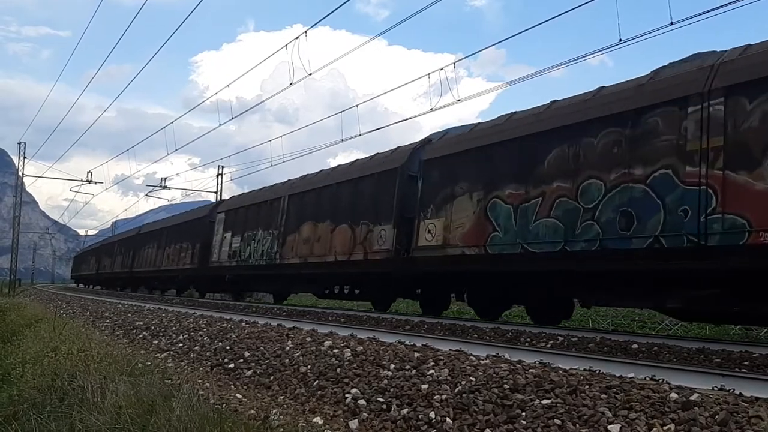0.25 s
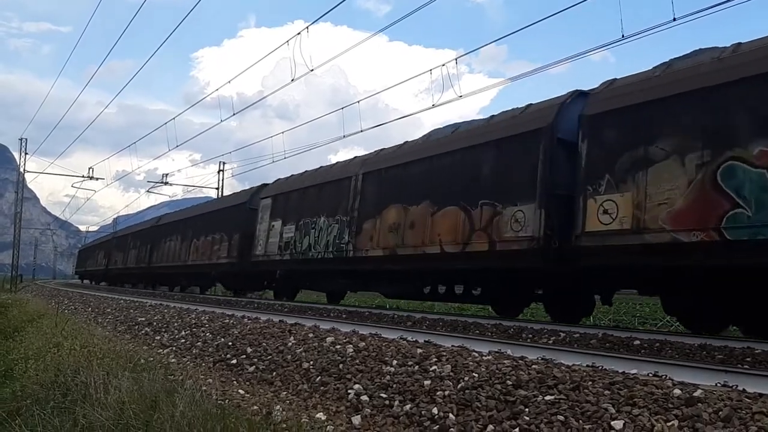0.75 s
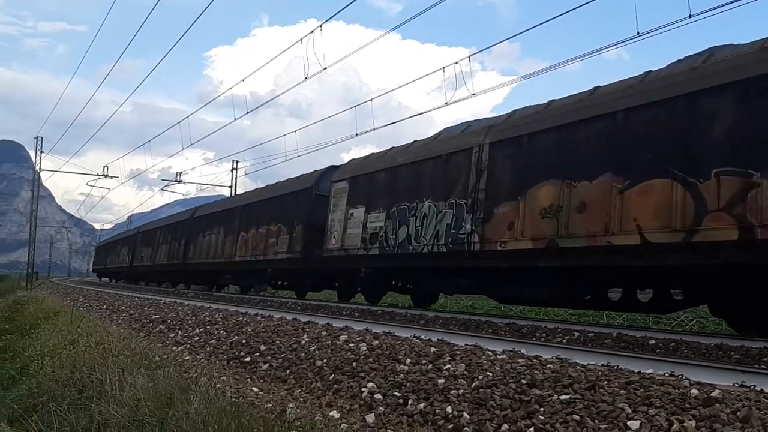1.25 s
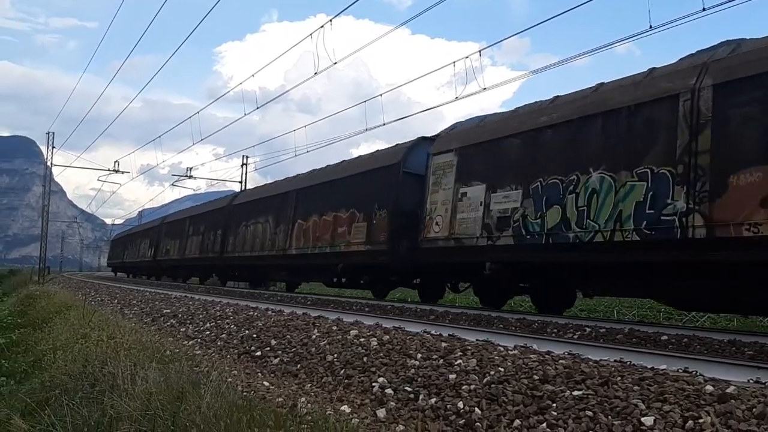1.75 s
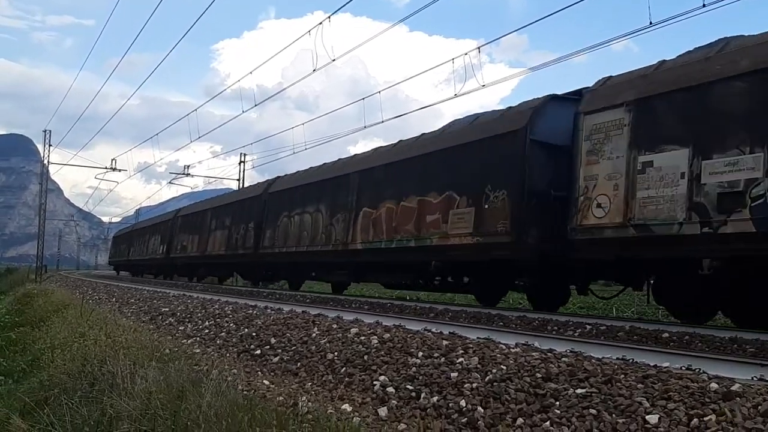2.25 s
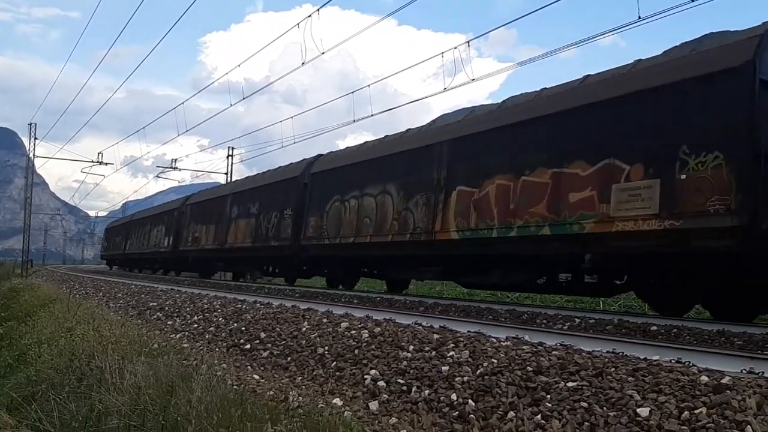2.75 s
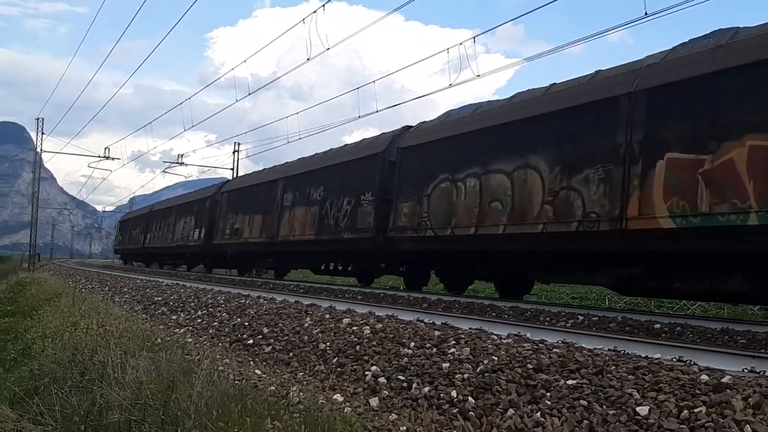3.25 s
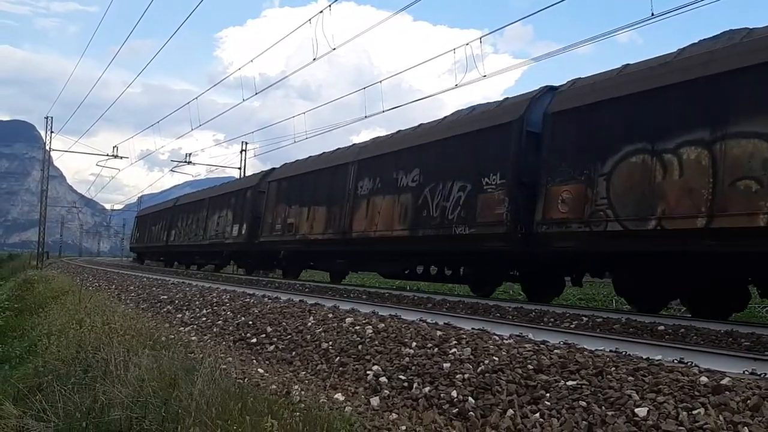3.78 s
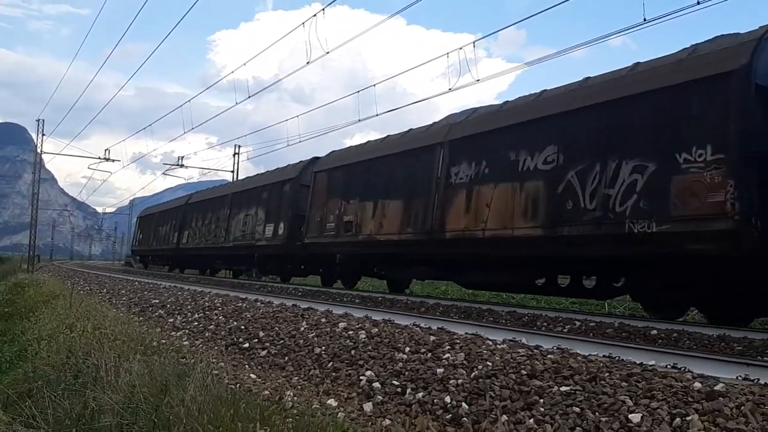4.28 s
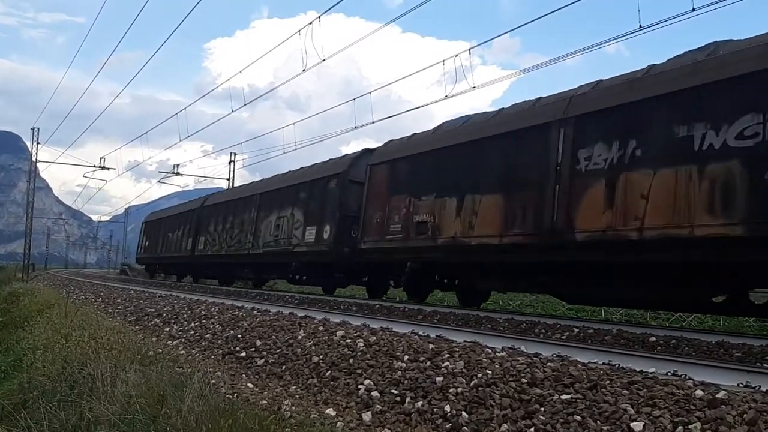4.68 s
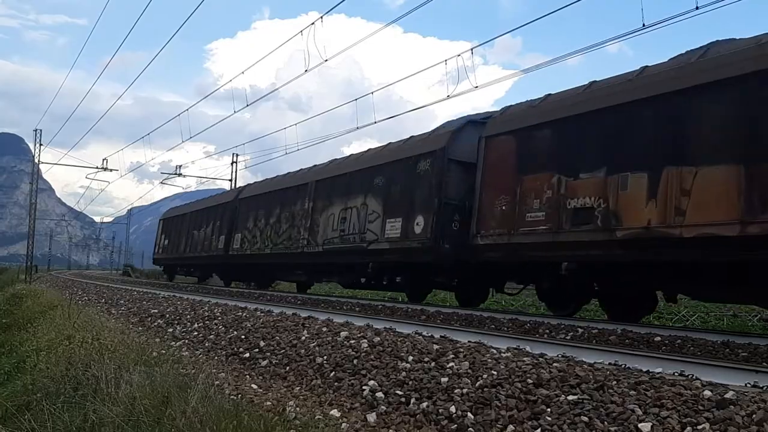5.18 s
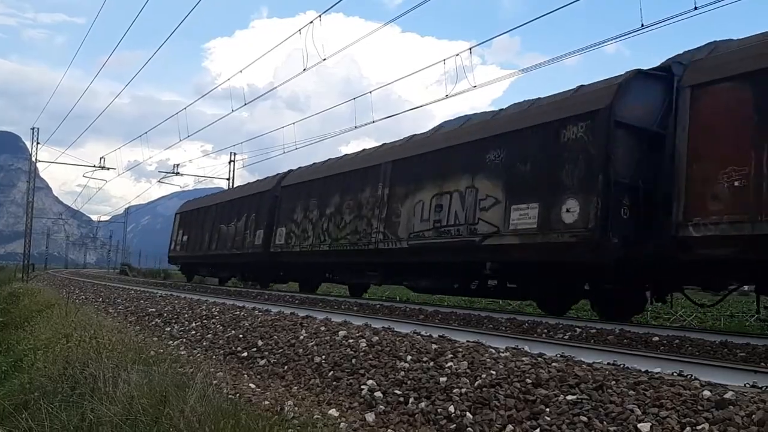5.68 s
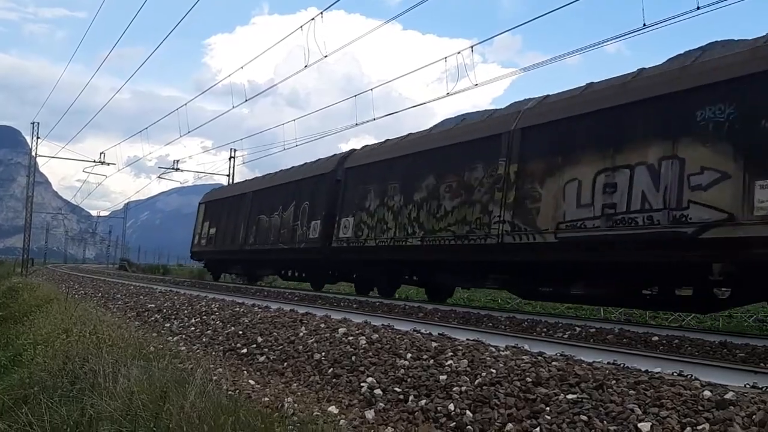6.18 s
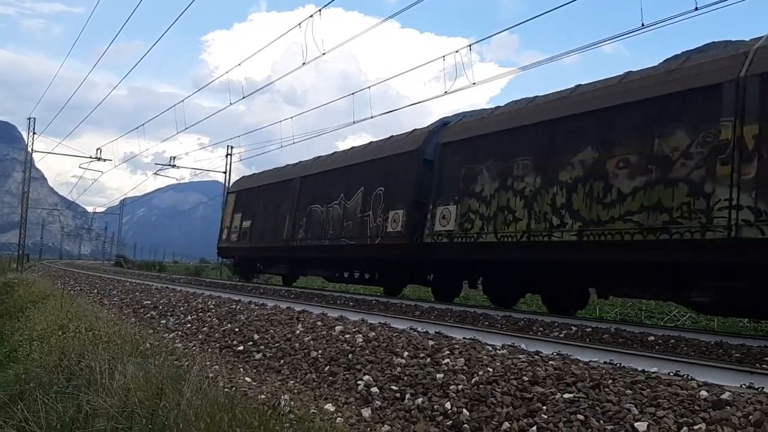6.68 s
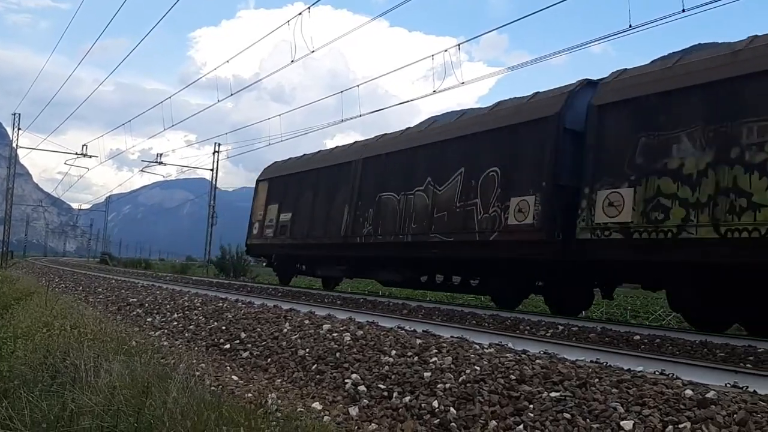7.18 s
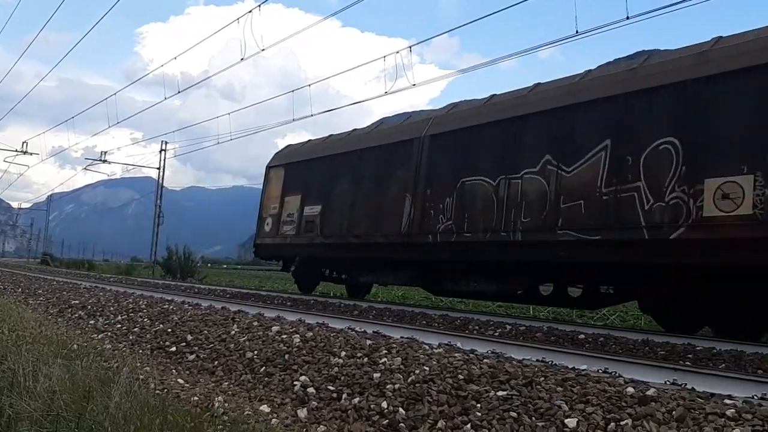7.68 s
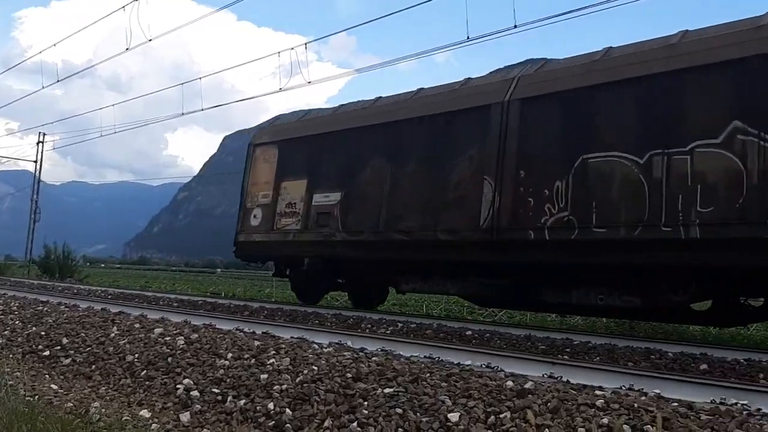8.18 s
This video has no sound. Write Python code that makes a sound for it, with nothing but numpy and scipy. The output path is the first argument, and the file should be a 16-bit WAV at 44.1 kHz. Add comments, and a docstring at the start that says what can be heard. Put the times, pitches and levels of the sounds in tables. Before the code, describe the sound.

Freight wagons rumble past on rails while a loud, high brake squeal sets in and then fades down the line.

```python
"""Beside a ballasted track, freight wagons roll past, their bodies booming and their wheels roaring.
Rough patches on the treads scuff and chirp, and steel hisses on steel. One braked bogie grinds
by stick-slip friction, which drives its wheel modes into a squeal; the tones sink in pitch by the
Doppler effect and fade down the line. Later brakes rub more lightly.
The right microphone faces away from the wheels, so the treble reaches mainly the left."""
import sys
import numpy as np
from scipy import signal
from scipy.fft import rfft, irfft, next_fast_len
from scipy.io import wavfile
from scipy.ndimage import uniform_filter1d

SR = 44100
rng = np.random.default_rng(int(sys.argv[2]) if len(sys.argv) > 2 else 0)


def dump_mix(stems):
    """Bounce the given channels to the path in sys.argv[1] as a 16-bit WAV at rate SR."""
    frames = np.atleast_2d(stems).T  # one column per channel
    limited = np.clip(frames, -1, 1)  # hard clip at full scale
    pcm = np.round(limited * 32767).astype(np.int16)
    wavfile.write(sys.argv[1], SR, pcm)


N = 371763
TIME = np.arange(N) / SR
TICKS = np.linspace(0, TIME[-1], 8192)   # coarse time grid for modulation
BITE_S, LET_GO_S = 2.117, 6.0   # the squealing bogie's brake blocks close and open


def from_db(db):
    """Amplitude grows tenfold for every 20 dB."""
    return np.exp(np.log(10) / 20 * np.asarray(db))


def unit_power(x):
    """Division by the root mean square gives unit power."""
    return x / np.sqrt(np.mean(np.abs(x) ** 2) + 1e-20)


def in_time(rows):
    """Linear interpolation gives a curve's value at every sample."""
    return np.interp(TIME, *np.transpose(rows))


def at_hz(points, hz):
    """Interpolation on a logarithmic frequency axis gives a spectrum's value."""
    point_hz, value = np.transpose(points)
    return np.interp(np.log(np.maximum(hz, 1)), np.log(point_hz), value)


def held(start_s, end_s, attack_s, release_s):
    """A trapezoidal envelope: attack, hold and release."""
    return np.clip(np.minimum((TIME - start_s) / attack_s, (end_s - TIME) / release_s), 0, 1)


def delayed(x, lag_s):
    """Propagation delays a sound by its travel time."""
    return np.pad(x, (round(lag_s * SR), 0))[:N]


def pan(left_over_right_db):
    """A level difference sets direction: left and right gains whose mean is one."""
    ratio = from_db(left_over_right_db)
    return np.array([2 * ratio, np.full_like(ratio, 2)]) / (1 + ratio)


def shelf(x, edge_hz, db):
    """A shelving filter raises or lowers everything below an edge."""
    low = signal.sosfiltfilt(signal.butter(2, edge_hz, fs=SR, output="sos"), x)
    return x + (from_db(db) - 1) * low


def wander(width_hz):
    """Low-pass complex noise of unit power gives random modulation, one value a tick."""
    hz = np.fft.fftfreq(len(TICKS), TICKS[1])
    white = rng.standard_normal(len(hz)) + 1j * rng.standard_normal(len(hz))
    return unit_power(np.fft.ifft(white / (1 + (hz / width_hz) ** 2)))


def noise(colour, coherence, flutter_db, flutter_hz):
    """Partially coherent stereo noise of unit power, with a shaped spectrum and a fluttering level."""
    size = next_fast_len(N, real=True)
    shape = from_db(at_hz(colour, np.fft.rfftfreq(size, 1 / SR))).astype(np.float32)
    white = rng.standard_normal((2, size), dtype=np.float32)
    mid, side = irfft(rfft(white) * shape, size)[:, :N]
    mid, side = np.sqrt(1 + coherence) * mid, np.sqrt(1 - coherence) * side
    flutter = np.interp(TIME, TICKS, from_db(flutter_db * wander(flutter_hz).real))
    return unit_power(np.array([mid + side, mid - side]) * flutter)


def bursts(rows, rough, width_hz, settle_s):
    """Random modulation broadens short swelling tones; the longer ones are purer."""
    out, unrest = np.zeros(N), wander(width_hz)
    for centre_s, half_s, hz, db in rows:
        modulation = unit_power(1 + rough * min(1, settle_s / half_s) * unrest)
        on = slice(*np.searchsorted(TIME, [centre_s - half_s, centre_s + half_s]))
        swell = np.cos(np.pi / 2 * (TIME[on] - centre_s) / half_s) ** 2
        tone = np.interp(TIME[on], TICKS, modulation) * np.exp(2j * np.pi * hz * TIME[on])
        out[on] += from_db(db) * swell * tone.real
    return out


# Boom of the wagons. Each row: time in seconds, level in dB before the bass shelf.
BOOM_LEVEL = [(0.1, -32), (0.99, -31), (1.11, -39), (1.32, -29), (1.38, -35.5), (1.85, -32), (3.29, -43),
              (4.14, -39.5), (4.49, -44.5), (4.54, -36.5), (5.64, -33.5), (5.66, -41), (5.91, -45.5),
              (7.5, -36), (7.64, -43), (7.73, -34.5), (7.82, -42.5), (8.35, -39)]
# Its spectrum. Each row: frequency in Hz, relative density in dB.
BOOM_SPECTRUM = [(20, -45), (32, -37), (50, -21), (64, -11), (80, -4), (102, 2.5), (130, 0), (190, -3.5),
                 (250, -21.5), (400, -26.5), (900, -73.5)]
# Its deep bass. Each row: time in seconds, shelf gain in dB.
BOOM_BASS = [(0, -6), (1.3, 11), (3.6, 8), (5.8, -2), (6.6, -5), (8.43, -11)]
# Its direction. Each row: time in seconds, left over right in dB before a small rightward shift.
BOOM_SIDE = [(0.1, -8.5), (3.27, -10), (3.38, -7), (3.82, 6.5), (6.17, 1.5), (8.35, 3.5)]


def rumble(bass_edge_hz=70, rightward_db=.7):
    """Structure-borne vibration radiates from wagon bodies and track bed as a boom, with a few knocks."""
    boom = noise(BOOM_SPECTRUM, coherence=0.93, flutter_db=1.5, flutter_hz=9.7)
    boom = shelf(from_db(in_time(BOOM_LEVEL)) * boom, bass_edge_hz, in_time(BOOM_BASS))
    return pan(in_time(BOOM_SIDE) - rightward_db) * (boom + knocks())


# Roar of the wheels. Each row: time in seconds, level in dB before gain and scuffs.
ROAR_LEVEL = [(0.05, -42), (0.3, -41.5), (0.42, -44), (1.93, -40.5), (2.98, -51), (3.12, -46.5),
              (3.26, -55), (3.42, -47.5), (3.47, -51), (5.75, -49), (6.91, -42), (8.4, -43)]
# Its spectrum. Each row: frequency in Hz, relative density in dB.
ROAR_SPECTRUM = [(80, -16), (130, 3.5), (190, 7), (310, 2.5), (430, -0.5), (580, -1), (780, -6.5),
                 (1000, -9), (1500, -15), (3000, -38), (8000, -45)]


def rolling(gain_db=5.5, scuff_lift_db=2.5):
    """Surface roughness excites wheel and rail into a low roar that lifts at each scuff."""
    scuffs = scuffing()
    level_db = in_time(ROAR_LEVEL) + gain_db + scuff_lift_db * scuffs / scuffs.max()
    return from_db(level_db) * noise(ROAR_SPECTRUM, coherence=1.0, flutter_db=1.3, flutter_hz=23)


# Hiss of the rails. Each row: time in seconds, level in dB without the scuffs.
HISS_LEVEL = [(0, -39), (2.1, -39.5), (3.2, -62), (5.9, -44.5), (7.6, -45), (8.43, -56)]
# Sizzle, one list before the squeal and one after. Each row: time in seconds, level in dB before gain.
SIZZLE_LEVELS = [
    [(0.0, -50), (0.08, -52), (0.37, -51), (0.41, -57), (1.24, -49.5), (1.31, -53), (1.59, -48),
     (1.74, -56), (2.09, -66)],
    [(5.98, -50), (6.23, -42), (6.69, -42), (6.94, -48), (7.23, -47), (7.52, -50.5), (7.84, -44.5),
     (8.38, -46.5), (8.4, -49)],
]
# Their spectra. Each row: frequency in Hz, relative density in dB.
HISS_SPECTRUM = [(400, -10), (900, 2), (1350, 1), (2000, -2), (3100, -1.5), (4400, -3), (5400, -6),
                 (6300, -12), (8200, -11), (9300, -15), (11700, -18), (15700, -7)]
SIZZLE_SPECTRUM = [(7000, -35), (10500, -7), (11700, -8), (12500, 2), (13700, 5), (14500, -1),
                   (15700, -7.5)]


def rails(sizzle_gain_db=4.5):
    """Steel-on-steel contact radiates hiss and a fine sizzle; the scuffs add to the hiss in power."""
    hiss_gain = np.hypot(from_db(in_time(HISS_LEVEL)), scuffing())
    sizzle_gain = from_db(in_time(np.vstack(SIZZLE_LEVELS)) + sizzle_gain_db)
    hiss = noise(HISS_SPECTRUM, coherence=0.35, flutter_db=0.6, flutter_hz=70)
    sizzle = noise(SIZZLE_SPECTRUM, coherence=0.35, flutter_db=0.5, flutter_hz=60)
    return hiss_gain * hiss + sizzle_gain * sizzle


# Squeaks and groans. Each row: centre in seconds, half length in seconds, frequency in Hz, level in dB.
SQUEAK_TONES = [(.13, .098, 7900, -49), (.47, 0.052, 3170, -37), (.47, 0.065, 8550, -42.5),
                (.68, .063, 3050, -36.5), (1.265, 0.024, 9870, -38), (1.585, .023, 9850, -41),
                (1.8, .03, 6100, -44), (2.03, 0.054, 2960, -35.5), (2.085, .035, 5930, -35.5),
                (2.14, .035, 2240, -29.5), (2.14, 0.023, 4700, -41), (2.14, .033, 7450, -32),
                (4.0, 0.58, 4360, -32.5), (4.6, 0.21, 1098, -39), (6.45, 0.69, 7530, -47),
                (6.55, .25, 14200, -47), (6.56, 0.31, 1100, -36.5), (6.82, 0.099, 1130, -38.5),
                (7.6, .16, 5570, -49), (7.85, .12, 10420, -44), (7.86, .12, 8500, -49),
                (8.13, 0.34, 7480, -47)]
CHIRP_HZ, CHIRP_HALF_S = 8100, 0.019
CHATTER_PER_S, CHATTER_HALF_S, CHATTER_DB = 9, 0.027, -49.5


def squeaks(chatter_hz=10630, spread_hz=300):
    """Friction excites brief tones: wheel and coupling squeaks, scuff chirps, chatter before braking."""
    chirps = [(centre_s, CHIRP_HALF_S, CHIRP_HZ, db) for centre_s, _, db in TREAD_SCUFFS]
    draws = rng.random((round(CHATTER_PER_S * BITE_S), 2))
    chatter = [(BITE_S * when, CHATTER_HALF_S, chatter_hz + spread_hz * (2 * pitch - 1), CHATTER_DB)
               for when, pitch in draws]
    return bursts(SQUEAK_TONES + chirps + chatter, rough=2.5, width_hz=135, settle_s=.12)


# Scuffs of the treads. Each row: centre in seconds, hiss level in dB, chirp level in dB.
TREAD_SCUFFS = [(.31, -38.5, -32), (.63, -37, -38), (.945, -37.5, -41), (1.275, -38.5, -38),
                (1.59, -39.5, -38), (1.81, -39.5, -54), (1.92, -37.5, -45)]


def scuffing(half_s=0.048):
    """Rotation brings rough patches onto the rail about once a turn: the envelope of their hiss."""
    swells = sum(from_db(db) * np.exp(-((TICKS - centre_s) / half_s) ** 2)
                 for centre_s, db, _ in TREAD_SCUFFS)
    return np.interp(TIME, TICKS, swells)


SPEED_M_PER_S, NEAREST_M, ABREAST_S, SOUND_M_PER_S = 9.0, 11.3, 3.57, 343


def passing():
    """Uniform motion sets the bogie's bearing (1 coming, -1 going) and distance in dB over the nearest."""
    to_go_m = SPEED_M_PER_S * (ABREAST_S - TIME)
    distance_m = np.hypot(to_go_m, NEAREST_M)
    return to_go_m / distance_m, 20 * np.log10(distance_m / NEAREST_M)


# Grinding of the brake blocks. Each row: time in seconds, level in dB before gain, pressure and shelf.
GRIND_LEVEL = [(2.17, -25), (2.58, -25), (2.7, -30), (3.2, -27), (3.26, -31.5), (3.47, -28), (3.51, -33.5),
               (3.97, -30), (4.85, -31), (4.87, -34.5), (5.33, -34.5), (5.93, -44.5)]
# Its spectrum. Each row: frequency in Hz, relative density in dB.
GRIND_SPECTRUM = [(400, -22.5), (800, -14.5), (1200, -9), (1600, -9.5), (2100, -2.5), (2580, -6),
                  (2780, 2.5), (3400, -2), (4000, -1.5), (4700, 4.5), (5500, -1.5), (6300, -5.5),
                  (10000, -5), (15700, -9)]


def grinding(gain_db=6, touch_share=.45, body_hz=2280, body_front_db=-4.5):
    """Stick-slip of blocks on treads makes harsh noise: a first touch, full pressure, release."""
    touch = held(BITE_S, LET_GO_S, attack_s=.002, release_s=.07)
    clamp = held(BITE_S, LET_GO_S, attack_s=.048, release_s=.07) ** 2
    pressure = touch_share * touch + (1 - touch_share) * clamp
    strength = from_db(in_time(GRIND_LEVEL) + gain_db) * pressure
    grind = strength * noise(GRIND_SPECTRUM, coherence=0.43, flutter_db=-0.6, flutter_hz=160)
    bearing, _ = passing()
    return shelf(grind, body_hz, body_front_db * bearing)   # less body towards the bogie's front


def ringing(friction, depth_db=4.0, life_s=0.1):
    """Resonance colours friction noise: many weak, narrow wheel modes swell and die at random."""
    _, frame_s, frames = signal.stft(friction.astype(np.float32), SR, nperseg=1024)
    retained = np.exp(-frame_s[1] / life_s)
    swells = signal.lfilter([1], [1, -retained], rng.standard_normal(frames.shape[1:]))
    swells = unit_power(uniform_filter1d(swells, size=2, axis=0))   # neighbouring bins move together
    return signal.istft(frames * unit_power(from_db(depth_db * swells)), SR)[1][:, :N]


# Radiation by mode group. Each row: base level abreast in dB, dB lost per dB of distance,
# extra dB towards the front, relative level in dB left once the blocks let go.
GROUP_RADIATION = { "low": (-28.5, 1.0, 4, -9), "lead": (-25, 1.5, 2.5, -6.5),
                   "3.7": (-40, -0.3, 15.5, -30), "5.7": (-34, 0, 4.5, -20), "6.7": (-33, 0.9, 3, -13),
                   "7.7": (-33.5, 0.37, 4, -28), "8.7": (-38.5, 1.3, 11.5, -14),
                   "top": (-27.5, 2.3, 5.5, -12)}
# A group catches hold. Each row: centre in seconds, half length in seconds, group, boost in dB.
GROUP_FLARES = [(2.208, .08, "5.7", 14.5), (2.33, 0.26, "6.7", 16), (2.5, 0.27, "8.7", 8.5),
                (2.456, 0.086, "lead", 3), (2.625, 0.038, "lead", 7.5), (2.704, 0.15, "5.7", 14),
                (2.784, 0.28, "7.7", 10), (2.994, 0.72, "3.7", 8), (3.093, 0.42, "top", 3),
                (3.16, 0.13, "6.7", 15.5), (3.283, 0.14, "lead", 10.5), (3.574, .1, "lead", 7),
                (3.92, .08, "lead", 8.5), (4.023, 0.12, "7.7", 10), (4.14, 0.22, "3.7", 23),
                (4.47, 0.18, "3.7", 21), (4.5, .1, "6.7", 5), (4.562, 0.28, "top", 10.5),
                (4.51, 0.17, "5.7", 7), (4.98, 0.43, "5.7", 5.5), (4.6, 0.12, "lead", 7.5),
                (5.032, 0.19, "lead", 4.5), (6.4, 0.14, "lead", 3.5), (5.453, 0.16, "7.7", 10.5),
                (5.478, 0.11, "6.7", 12)]
BUILD_S, DIE_S = 0.052, 0.48
LINGER_END_S, LINGER_DROP_S, LINGER_DROP_DB = 7.72, 0.15, -5


def mode_strength(group, bearing, distance_db, flicker_db=3, flicker_hz=7.9):
    """Directivity, distance and uneven frictional drive set the amplitude of a group of modes."""
    base_db, falloff, front_db, linger_db = GROUP_RADIATION[group]
    flare_db = sum(boost_db * np.cos(np.pi / 2 * np.clip((TICKS - centre_s) / half_s, -1, 1)) ** 2
                   for centre_s, half_s, name, boost_db in GROUP_FLARES if name == group)
    unrest_db = np.interp(TIME, TICKS, flare_db + flicker_db * wander(flicker_hz).real)
    # once the blocks let go a faint ring is left, which drops further later
    drop_db = LINGER_DROP_DB * (1 - held(-np.inf, LINGER_END_S, 1, LINGER_DROP_S))
    linger = from_db(linger_db + drop_db) * held(BITE_S, np.inf, BUILD_S, DIE_S)
    drive = np.maximum(held(BITE_S, LET_GO_S, BUILD_S, DIE_S), linger)
    return from_db(base_db - falloff * distance_db + front_db * bearing + unrest_db) * drive


# Wheel modes by group. Each row: frequency at rest in Hz, level within the group in dB,
# steady share from 0 to 1.
WHEEL_MODES = { "low": [(1198, -38, 0.21), (1327, -24.5, 0.5), (1932, -28, 0.07), (2267, -18, 0.16),
               (2830, -23.5, 0.23), (3120, -18.5, 0), (4456, -14, 0.47), (4700, -19.5, 0.44)],
               "lead": [(9722, -0.5, 0.88)], "3.7": [(3530, -12.5, 0.8), (3673, -4, 0.7)],
               "5.7": [(5655, -8.5, 0.81), (5728, 0.5, 0.87)], "6.7": [(6750, -7, 0.53)],
               "7.7": [(7720, 0, 0.8), (7790, -10, 0.4)], "8.7": [(8730, 0.5, 1), (8850, -19, .5)],
               "top": [(10660, -12, 0.9), (11600, -22, 0.8), (11640, -14.5, 0.6), (12360, -13, 0.5),
               (12470, -12, 0.7), (13000, -17, 0.3), (13500, -16, .5), (13500, -10, 0.3), (13000, -17, 0.6),
               (13700, -17, .3), (14000, -18, .4), (14315, -24, 0.9), (14800, -17, 0.7), (14800, -14, 0.7),
               (14900, -15, .3), (15206, -12, .5), (15430, -6.5, 0.7), (15700, -19, 0.7)]}


def squeal(line_hz=14, skirt_hz=135, swell_db=6.0, swell_hz=1.3):
    """Self-excited oscillation: friction keeps the wheel modes singing, all on one Doppler glide."""
    bearing, distance_db = passing()
    wheel_time = np.cumsum(1 / (1 - bearing * SPEED_M_PER_S / SOUND_M_PER_S)) / SR
    # the further the bogie has gone, the more of its sound arrives scattered
    scatter = .44 * np.interp(TICKS, [3.6, 6], [1, 1.45])
    out = np.zeros(N)
    for group, modes in WHEEL_MODES.items():
        strength = mode_strength(group, bearing, distance_db)
        on = np.flatnonzero(strength)
        t, gain = TIME[on], np.sqrt(2) * strength[on]
        for hz, db, steady in modes:
            # paths by ballast and wagon sides differ in Doppler shift: the line beats and grows a skirt
            line = np.sqrt(steady) + np.sqrt(1 - steady) * wander(line_hz)
            skirt = scatter * wander(skirt_hz)
            # unsteady modes also catch and let go
            swell = unit_power(from_db((1 - steady) * swell_db * wander(swell_hz).real))
            phasor = (line + skirt) * swell
            phase = 2 * np.pi * hz * wheel_time[on] + np.interp(t, TICKS, np.unwrap(np.angle(phasor)))
            out[on] += gain * from_db(db) * np.interp(t, TICKS, np.abs(phasor)) * np.cos(phase)
    return out


# Wagon knocks. Each row: centre in seconds, half length in seconds, frequency in Hz, level in dB.
WAGON_KNOCKS = [(2.28, .02, 419, -41), (4.62, 0.027, 193, -24), (6.08, 0.011, 319, -31.5),
                (7.72, 0.023, 146, -31)]


def knocks():
    """A low tone lasting only a few cycles has a broad spectrum and is heard as a dull knock."""
    return bursts(WAGON_KNOCKS, rough=0.41, width_hz=140, settle_s=0.055)


# Later brakes. Each row: start, end and attack in seconds, starting level in dB, fade in dB per second.
BRAKE_RUBS = [(5.506, 5.98, 0.3, -39.5, -1), (6.065, 6.93, 0.011, -34.5, 3),
              (7.687, 8.6, 0.087, -37.5, 6.5)]
# Their spectrum. Each row: frequency in Hz, relative density in dB.
RUB_SPECTRUM = [(400, -33), (700, -4.5), (1150, -3), (1600, -5.5), (1950, -1), (2150, 5.5), (2500, -4),
                (2900, 0.5), (3250, -7), (3600, 1.5), (3950, -9.5), (4350, 3), (5500, -6), (6300, -10.5),
                (15000, -12)]


def rubbing(release_s=0.073):
    """Lighter sliding friction of later brakes radiates spells of grainy noise."""
    strength = sum(from_db(db - fade * (TIME - start_s)) * held(start_s, end_s, attack_s, release_s)
                   for start_s, end_s, attack_s, db, fade in BRAKE_RUBS)
    return strength * noise(RUB_SPECTRUM, coherence=0.12, flutter_db=-0.7, flutter_hz=100)


# Spectrum of distant brakes. Each row: frequency in Hz, relative density in dB.
DRAG_SPECTRUM = [(2500, -35), (3700, -4), (4320, -3), (5000, -4.5), (5620, -6), (6200, -20.5), (12000, -20)]


def far_brakes(start_s=6.6, level_db=-43.5, fade_db_per_s=2.6):
    """Friction of brakes dragging down the line gives a band of noise that fades exponentially."""
    onset = held(start_s, np.inf, attack_s=0.34, release_s=1)
    strength = from_db(level_db - fade_db_per_s * (TIME - start_s)) * onset
    return strength * noise(DRAG_SPECTRUM, coherence=0.25, flutter_db=0.5, flutter_hz=25)


# Imbalance of the wheel sound near 3 kHz. Each row: time in seconds, left over right in dB.
SHADOW_DEPTH = [(0, 27.5), (4.75, 24.5), (5.42, 23.5), (6.1, 9.5), (8.43, 10.5)]
# Its dependence on pitch. Each row: frequency in Hz, multiple of that difference.
SHADOW_BY_PITCH = [(120, .1), (250, .3), (500, .48), (1000, .68), (2000, .88), (4000, 1.12), (6000, 1.4),
                   (8000, 1.7), (10000, 1.4), (11500, 1.2), (13200, .8), (15500, 1.35)]


def shadow(x):
    """Acoustic shadowing: the right microphone faces away from the wheels and loses their treble."""
    hz, frame_s, frames = signal.stft(x, SR, nperseg=512)
    depth_db = np.interp(frame_s, *np.transpose(SHADOW_DEPTH))
    side_db = np.outer(at_hz(SHADOW_BY_PITCH, hz), depth_db)
    return signal.istft(frames * pan(side_db), SR)[1][:, :N]


def scene(reflection_s=.011, left_lag_s=.00034):
    """Superposition of wagon boom and wheel sound, arriving slightly sooner on the right."""
    boom = rumble()
    friction = rolling() + rails() + ringing(grinding() + rubbing() + far_brakes())
    tones = squeal() + squeaks()
    right_tones = .5 * tones + 0.61 * delayed(tones, reflection_s)   # direct plus reflected
    left, right = boom + shadow(friction + np.array([tones, right_tones]))
    return np.array([delayed(left, left_lag_s), right])


def record(dry, ceiling=.97, cutoff_hz=15900):
    """Soft saturation rounds the highest peaks, and a steep low-pass filter cuts the top."""
    rounded = dry / (1 + (dry / ceiling) ** 8) ** (1 / 8)
    low_pass = signal.ellip(14, .1, 80, cutoff_hz, fs=SR, output="sos")
    return signal.sosfilt(low_pass, rounded)


dry = scene()
out = record(dry)
dump_mix(out)
```